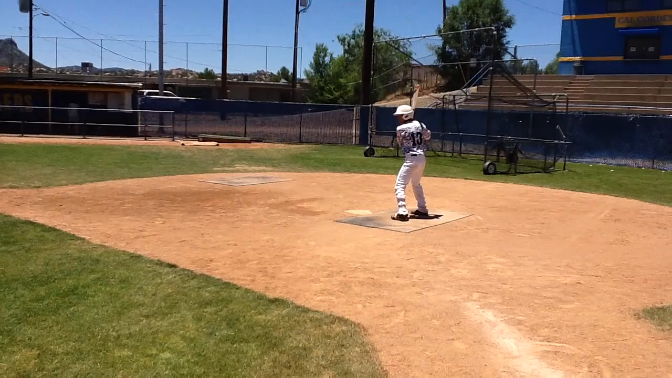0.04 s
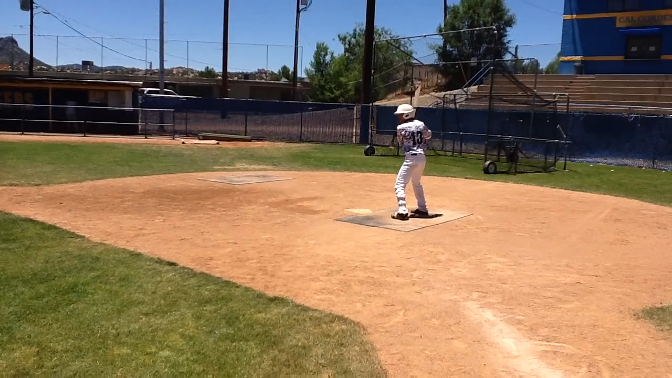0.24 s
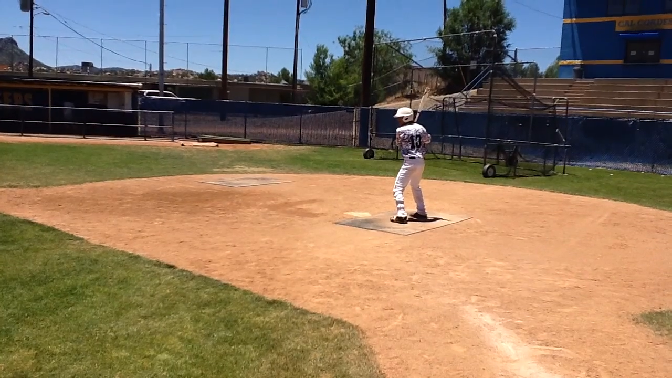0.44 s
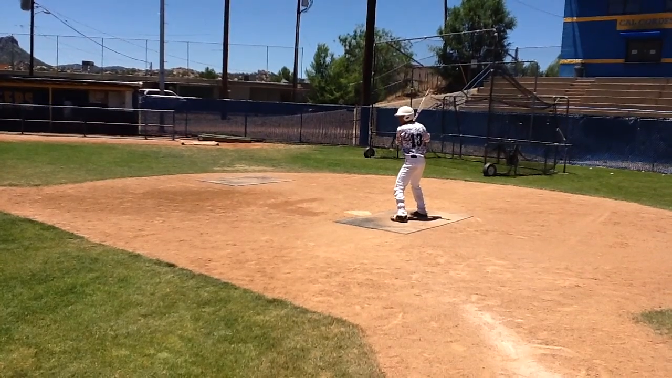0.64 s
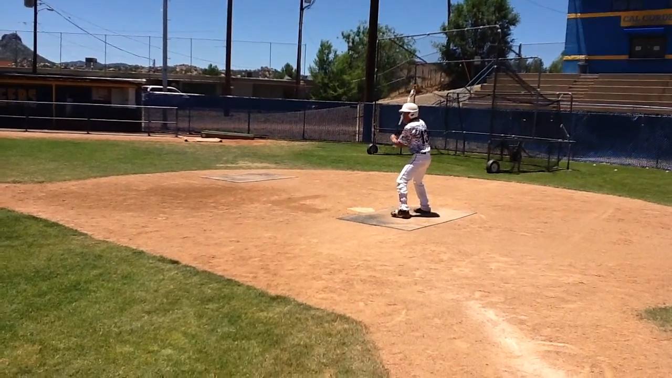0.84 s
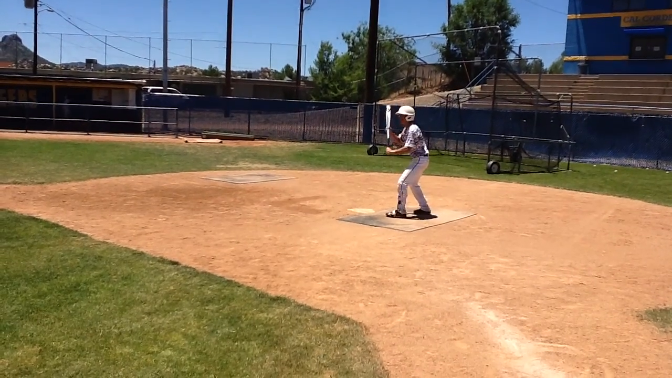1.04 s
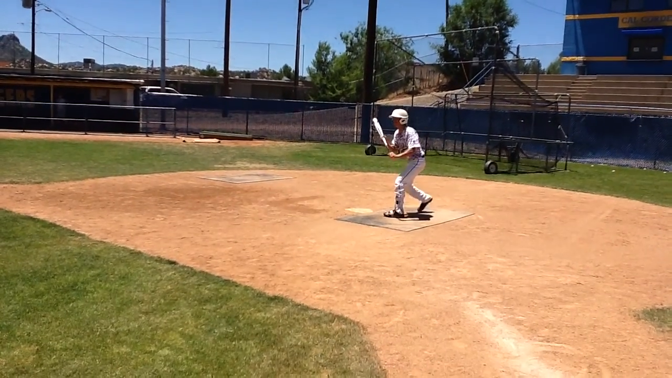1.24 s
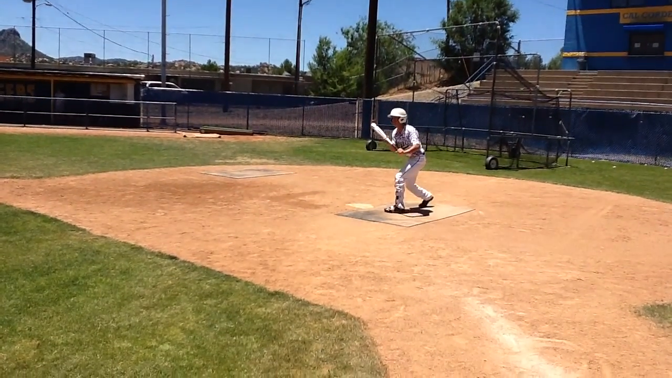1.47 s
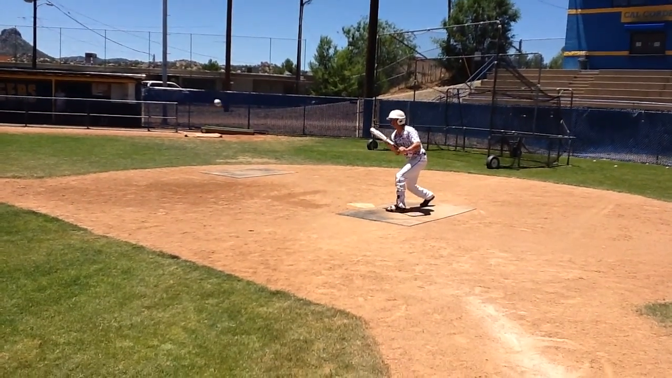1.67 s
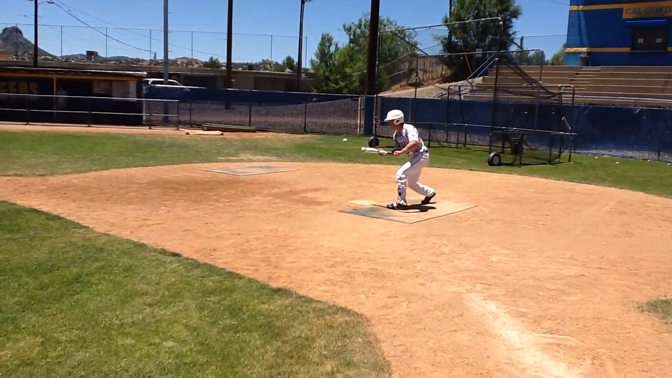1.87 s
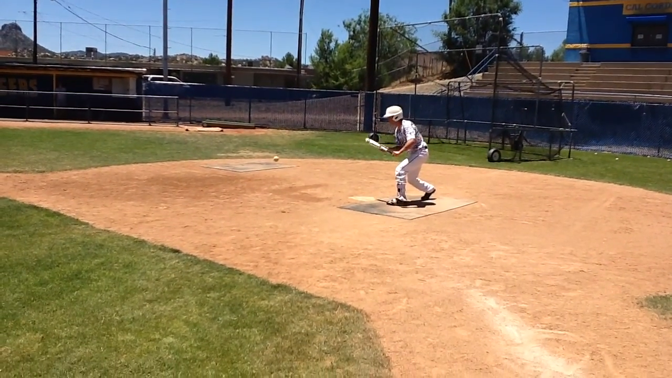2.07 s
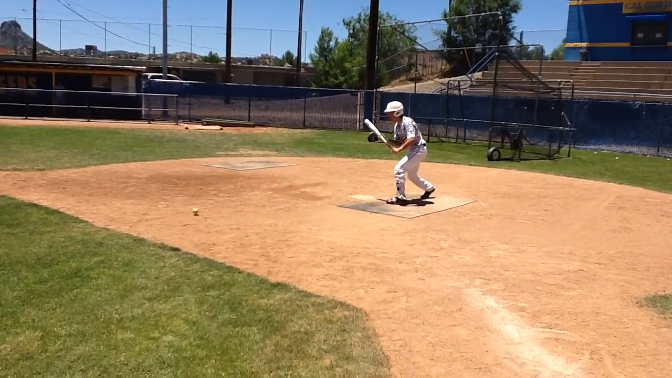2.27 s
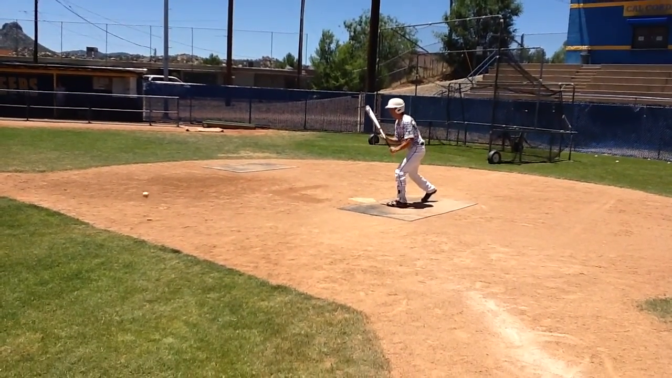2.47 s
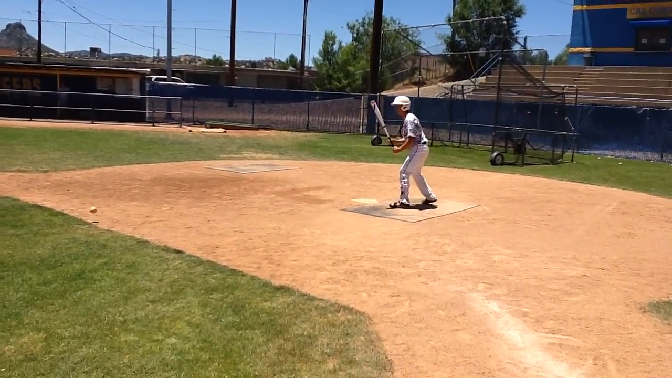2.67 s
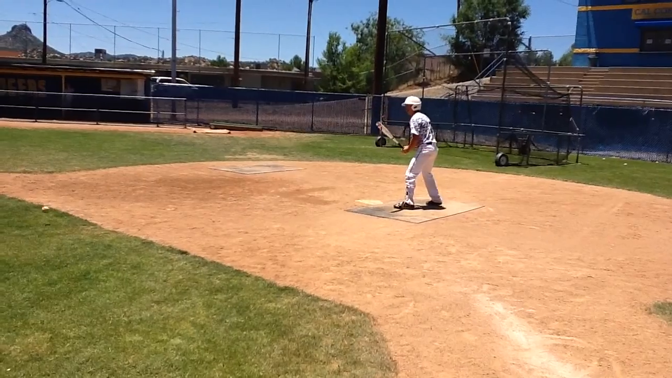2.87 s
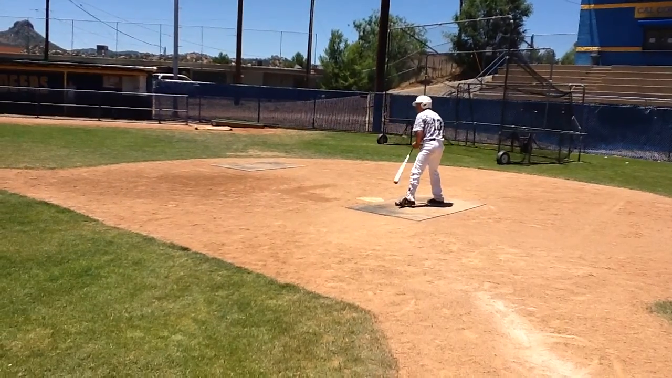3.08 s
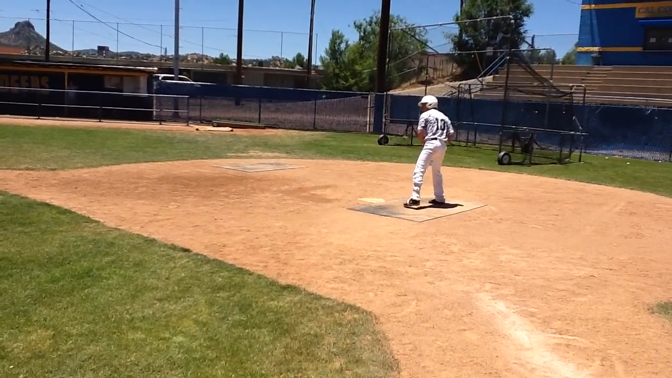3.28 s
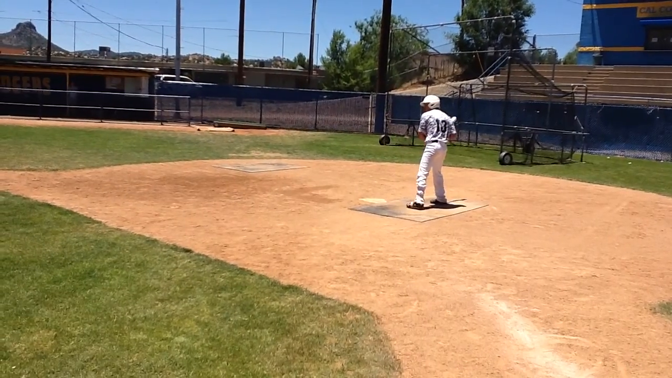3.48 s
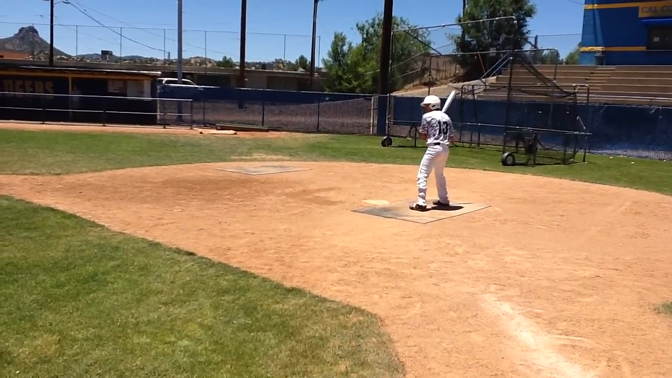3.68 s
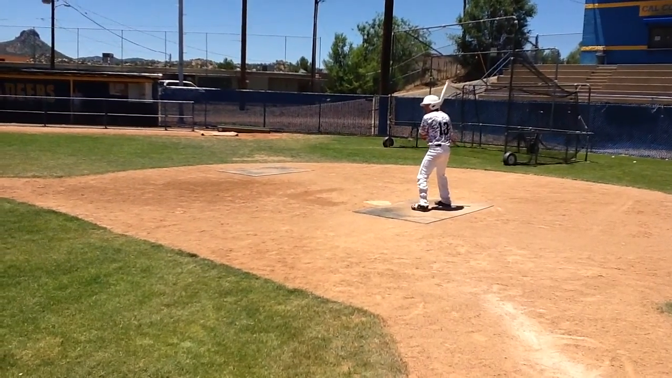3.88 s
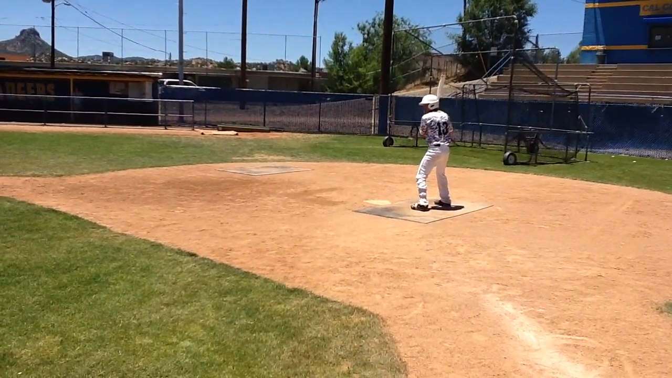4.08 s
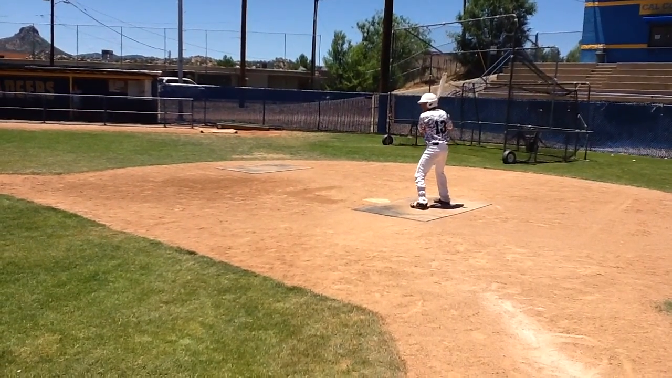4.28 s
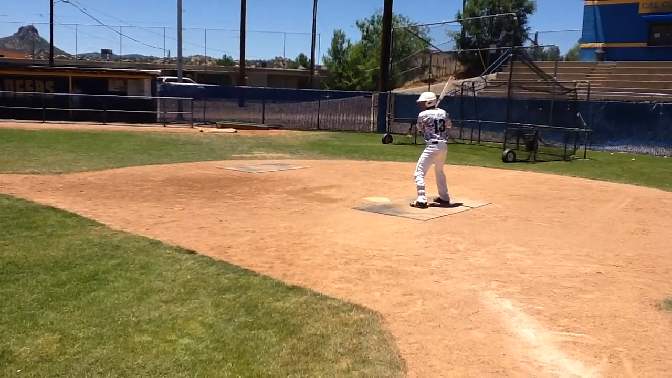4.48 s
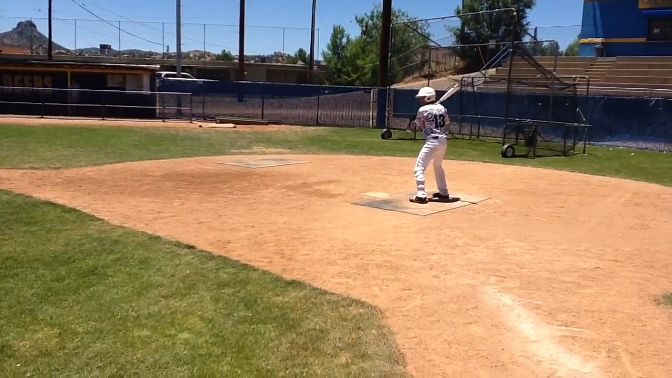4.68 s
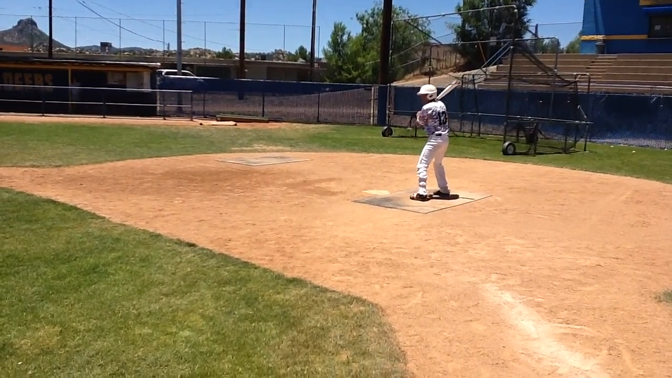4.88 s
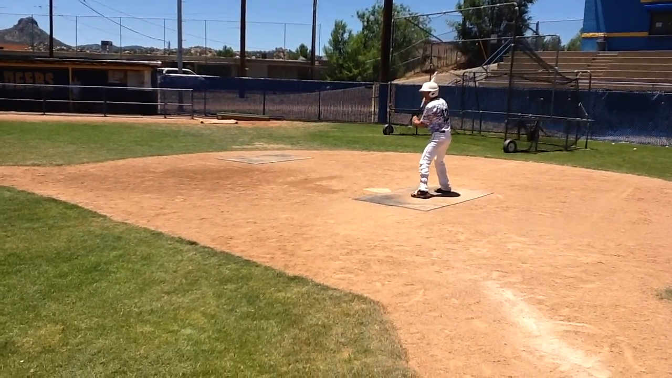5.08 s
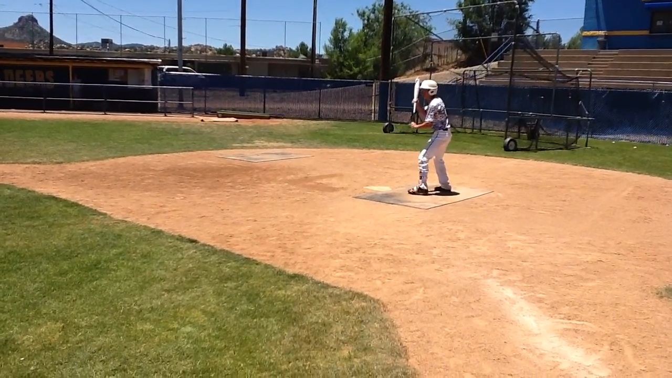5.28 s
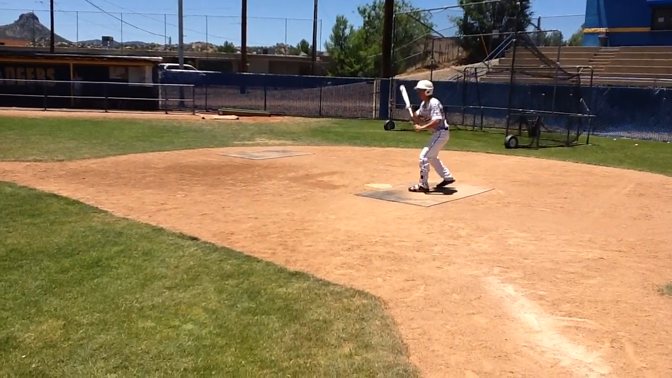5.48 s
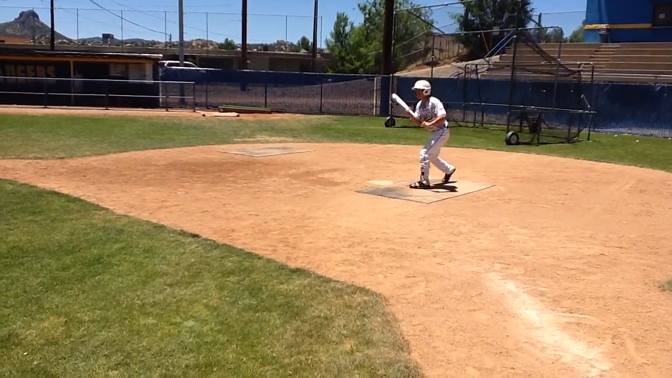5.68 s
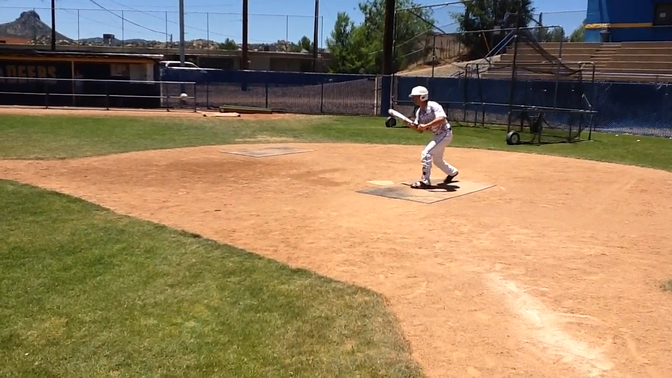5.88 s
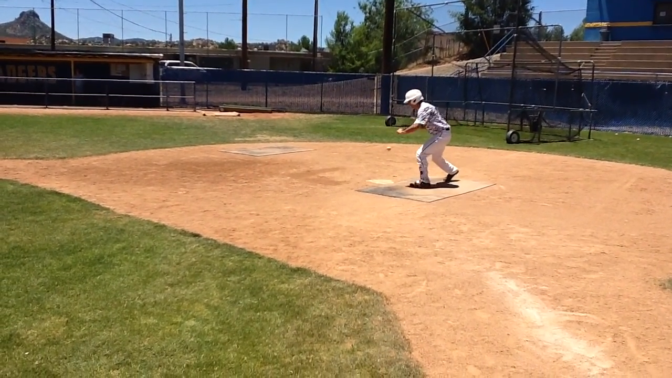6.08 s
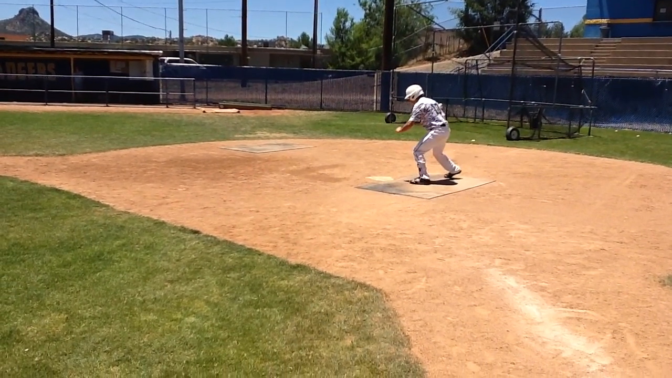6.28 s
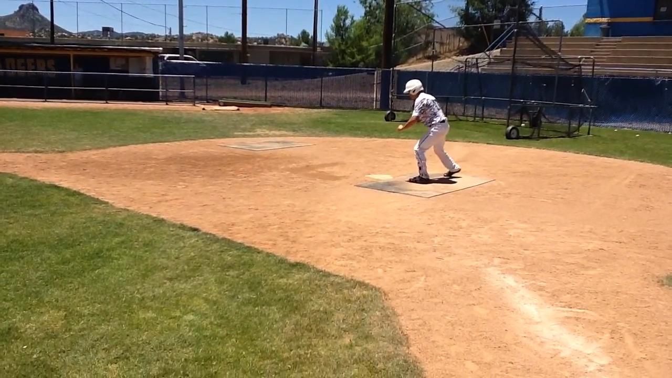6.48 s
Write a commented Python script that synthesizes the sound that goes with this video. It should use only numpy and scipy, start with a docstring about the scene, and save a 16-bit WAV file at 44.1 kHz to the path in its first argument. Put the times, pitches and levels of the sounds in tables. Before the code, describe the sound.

Soft open air and distant traffic hum under raspy bird chirps. A few gritty shoe scuffs lead to one loud, very short metallic bat knock, with thin echoes and a brief wash from the stands. The ball lands on dirt with small crunches. Birds continue as wind rises in uneven low thumps on the microphone, with more scuffs and a dull step late.

```python
"""A metal bat bunts a tossed baseball on an open field: decaying sines for the ring, a pulse and noise for
the crack, filtered copies and noise scatter for the answers of the ground, dugout, walls and stands.
The ball hops over the dirt and cleats scuff: short noise swells, with a dull push at each landing.
A songbird chatters in the trees: gliding sines. Far traffic and open air are shaped noise, with a faint
machine hum. Gusts stir the leaves and begin to buffet the microphone: noise driven by one force curve."""
import sys
import numpy as np
from scipy import signal
from scipy.fft import rfft, irfft, next_fast_len
from scipy.io import wavfile
from scipy.ndimage import map_coordinates

SR = 44100
rng = np.random.default_rng(int(sys.argv[2]) if len(sys.argv) > 2 else 0)


def dump_mix(stems):
    """Bounce the given channels to the path in sys.argv[1] as a 16-bit WAV at rate SR."""
    frames = np.atleast_2d(stems).T  # one column per channel
    limited = np.clip(frames, -1, 1)  # hard clip at full scale
    pcm = np.round(limited * 32767).astype(np.int16)
    wavfile.write(sys.argv[1], SR, pcm)


N = 288061


def amp(db):
    """Decibels to gain."""
    return 10 ** (np.asarray(db) / 20)


def unit(x):
    """Scale to rms 1."""
    return x / np.sqrt(np.mean(x ** 2) + 1e-20)


def unit_energy(x):
    """Scale to a sum of squares of 1."""
    return x / np.linalg.norm(x)


def seconds(length_s):
    """Time axis in seconds."""
    return np.arange(int(length_s * SR)) / SR


def add(track, start_s, sound):
    """Mix a sound into the track at start_s, cut at the track's end."""
    part = track[max(round(start_s * SR), 0):][:len(sound)]
    part += sound[:len(part)]


def wobble(rate_hz):
    """Smooth random curve through rate_hz random knots a second."""
    knots = rng.standard_normal(int(N * rate_hz / SR) + 4)
    return map_coordinates(knots, [np.arange(N) * rate_hz / SR])


def filtered(x, response):
    """Multiply the spectrum of x by a response of frequency in Hz."""
    size = next_fast_len(len(x) + 8192)
    gain = response(np.fft.rfftfreq(size, 1 / SR))
    return irfft(rfft(x, size) * gain, size)[:len(x)]


def noise(spectrum, size):
    """Noise of rms 1 with an (Hz, dB) spectrum, interpolated over log frequency."""
    knot_hz, knot_db = np.transpose(spectrum)
    white = rng.standard_normal(size)
    return unit(filtered(white, lambda hz: amp(np.interp(np.log(hz + 1), np.log(knot_hz), knot_db))))


def low_cut(x, hz):
    """Causal second-order high-pass."""
    return signal.sosfilt(signal.butter(2, min(hz, SR / 3), "high", fs=SR, output="sos"), x)


def high_cut(x, hz):
    """Causal first-order low-pass."""
    return signal.sosfilt(signal.butter(1, min(hz, SR / 3), fs=SR, output="sos"), x)


def swell(t, rise_s, t60_s):
    """Envelope that rises from time 0 and dies away."""
    t = np.maximum(t, 0)
    return (1 - np.exp(-t / rise_s)) * amp(-60 * t / t60_s)


# Spectrum of far traffic and open air. Each row: frequency in Hz, level in dB.
AIR_SPECTRUM = [(15, -66), (35, -38), (70, -20), (118, -14), (154, -1), (181, -17.5), (224, -8),
                (293, -25.5), (318, -22), (363, -21), (462, -20.5), (515, -19), (573, -22.5), (903, -19),
                (1910, -31.5), (3500, -38.8), (8000, -42.2), (15000, -46.7)]
# Tones of a distant machine. Each row: frequency in Hz, rms level in dB.
MACHINE_TONES = [(150.7, -58), (296, -71), (361, -73.5)]


def distance(air_db, waver_db, drift):
    """Far traffic as shaped noise, a machine as sines that waver in level and drift in pitch."""
    hum = np.zeros(N)
    for hz, db in MACHINE_TONES:
        level = amp(db + waver_db * wobble(18)) * np.sqrt(2)
        phase = 2 * np.pi * np.cumsum(hz * (1 + drift * wobble(12))) / SR
        hum += level * np.sin(phase)
    return hum + amp(air_db + 0.25 * wobble(2.93)) * noise(AIR_SPECTRUM, N)


# Wind force over time. Each row: time in seconds, force in dB.
WIND_FORCE = [(2.45, -45.5), (2.81, -41.6), (2.85, -48.2), (2.95, -41.3), (3.22, -51.2), (3.61, -37.6),
              (3.65, -40.9), (3.89, -35.5), (4.1, -46.1), (4.15, -30.3), (4.24, -45.7), (4.4, -36.9),
              (4.46, -40.6), (4.58, -27.8), (4.8, -15.5), (4.97, -31.5), (5.2, -27.7), (5.38, -40.3),
              (5.69, -28.3), (5.73, -37.8), (5.83, -25.7), (6.06, -41.5), (6.35, -25.5), (6.52, -33.7)]
# Main buffeting spectrum. Each row: frequency in Hz, level in dB.
BUFFET_SPECTRUM = [(20, -73), (50, -42), (90, -29), (130, -6), (165, 1.5), (230, -6.5), (320, -15.5),
                   (450, -28), (700, -43), (1500, -70), (4000, -100)]
# Deep rumble spectrum. Each row: frequency in Hz, level in dB.
RUMBLE_SPECTRUM = [(20, -29), (40, -34), (65, -7.5), (100, 5.5), (150, 1.5), (250, -16), (600, -51),
                   (2000, -100)]
# Spectrum of small, higher eddies. Each row: frequency in Hz, level in dB.
EDDY_SPECTRUM = [(110, -39), (190, -1), (340, 3), (470, -4.5), (650, -13.5), (900, -22.5), (1200, -40),
                 (3000, -86)]
# Single eddies that thump the microphone. Each row: centre in seconds, level in dB, frequency in Hz.
THUMPS = [(2.792, -36, 169), (3.725, -30, 230), (3.877, -30, 190), (4.15, -28, 162), (4.796, -18, 237.4),
          (4.853, -16.5, 172.4), (5.201, -21, 201), (5.689, -20.5, 163), (6.356, -17, 216)]
# Spectrum of stirred trees. Each row: frequency in Hz, level in dB.
LEAF_SPECTRUM = [(300, -30), (3000, -6), (9000, 0), (15000, -1)]
CALM_DB, FRESHEN_S = -60, 0.31  # force before the gusts, time to freshen to the first row
LEAVES_DB, LEAVES_DB_PER_DB = -70, .15  # level in the hardest gust, slope over force


def wind(lump_db, buffet_db, rumble_db, eddy_db, eddy_db_per_db, full_db):
    """Gusts stir leaves and buffet the mic; as force grows, rumble levels off and small eddies take over."""
    knot_s, knot_db = np.transpose(WIND_FORCE)
    times_s = np.r_[knot_s[0] - FRESHEN_S, knot_s]
    force_db = np.interp(np.arange(N) / SR, times_s, np.r_[CALM_DB, knot_db])
    force = amp(force_db)
    below_peak_db = force_db - knot_db.max()
    rumble = amp(rumble_db) * noise(RUMBLE_SPECTRUM, N) / np.hypot(1, force / amp(full_db))
    buffet = amp(buffet_db) * unit(noise(BUFFET_SPECTRUM, N) * amp(lump_db * wobble(60)))
    eddies = unit(noise(EDDY_SPECTRUM, N) * amp(lump_db * wobble(90)))
    eddies *= amp(eddy_db + eddy_db_per_db * below_peak_db)
    leaves = amp(LEAVES_DB + LEAVES_DB_PER_DB * below_peak_db) * noise(LEAF_SPECTRUM, N)
    out = force * (rumble + buffet + eddies) + leaves
    t = seconds(.04) - .02  # centred on the thump
    for centre_s, db, hz in THUMPS:
        envelope = np.exp(-(t * hz / 0.71) ** 2)
        add(out, centre_s + t[0], amp(db) * envelope * np.sin(2 * np.pi * hz * t))
    return out


FADE_HZ = 2950  # the bird's voice fades below this pitch
KINK = .45  # turn at the middle pitch: 0 smooth arc, 1 corner


def whistle(length_s, start_hz, middle_hz, end_hz, rasp):
    """One note bends through three pitches, weak at the low end; fast random pitch flutter makes it raspy."""
    t = seconds(length_s)
    u = np.linspace(0, 1, num=len(t))
    knots = [0, .5, 1], [start_hz, middle_hz, end_hz]
    arc_hz = np.polyval(np.polyfit(*knots, 2), u)
    hz = (1 - KINK) * arc_hz + KINK * np.interp(u, *knots)
    flutter = np.interp(u, np.linspace(0, 1, num=40), rng.standard_normal(40))
    envelope = np.sqrt(2 * np.abs(np.sin(np.pi * u))) / np.hypot(1, (FADE_HZ / hz) ** 20)
    return envelope * np.sin(2 * np.pi * np.cumsum(hz * (1 + rasp * flutter)) / SR)


# Notes of the stock phrase. Each row: start in seconds from the phrase time, length in seconds,
# start pitch in Hz, middle pitch in Hz, end pitch in Hz, level in dB.
PHRASE_NOTES = [(-.075, .05, 5200, 5380, 5380, -14), (-.03, .036, 3400, 4550, 5370, -3),
                (-.002, .03, 4950, 3820, 3300, -8), (0.012, .03, 3600, 3150, 2850, -8.5),
                (.042, .032, 2950, 3488, 4350, -3.5), (0.09, .032, 2850, 3354, 4300, -5)]
# Singings of the phrase. Each row: phrase time in seconds, level in dB.
PHRASE_TIMES = [(.237, -54), (.526, -62), (.96, -56), (1.462, -57), (2.152, -57.5), (2.653, -59.5),
                (3.654, -50.5), (4.313, -54), (4.915, -54), (6.47, -53.5)]
# Notes that dip and rise. Each row: bottom time in seconds, length in seconds, bottom pitch in Hz, level in dB.
DIP_NOTES = [(0.13, .048, 4000, -66), (.27, .052, 4450, -65), (0.4, .064, 4100, -63),
             (2.592, .08, 2750, -59), (2.93, .075, 2720, -61.5), (3.122, .085, 2680, -59.5),
             (3.232, .045, 3300, -69), (3.292, .035, 3020, -63.5), (4.814, 0.029, 3580, -62.5),
             (5.941, .042, 3850, -64), (6.008, 0.056, 3550, -63.5), (6.066, .06, 4050, -60),
             (6.198, .058, 3900, -58), (6.337, .046, 3900, -64)]
# Runs of falling slurs. Each row: start in seconds, first top pitch in Hz, level in dB, count of slurs.
FALL_RUNS = [(.527, 4450, -57, 2), (1.654, 4470, -62, 2), (1.806, 3650, -64, 1), (2.21, 3810, -63, 1),
             (2.70, 4170, -64.5, 2), (2.945, 3500, -66, 1), (3.37, 4200, -69, 1), (3.508, 4550, -61, 2),
             (3.94, 4420, -70, 2), (5.015, 3844, -61, 1), (5.34, 4450, -61.5, 2)]
DIP_RISE, DIP_TOP_HZ = 1.36, 5450  # end pitch over bottom pitch, its ceiling
FALL_S, FALL_EVERY_S, FALL_END_HZ = .042, .052, 2953
FALL_SAG, FALL_STEP = .27, .88  # share of the drop made halfway, each top over the last
SCOOP_S, SCOOP_DB = .022, -5  # upstroke into each slur, level relative to the slur


def bird(phrase_rasp, slur_rasp, echo_db, echo_t60_s, far_db, flicker_db):
    """A bird mixes raspy phrases with cleaner dips and slurs; others twitter far off; trees scatter it all."""
    song = np.zeros(N)
    for phrase_s, db in PHRASE_TIMES:
        for offset_s, length_s, start_hz, middle_hz, end_hz, note_db in PHRASE_NOTES:
            note = whistle(length_s, start_hz, middle_hz, end_hz, phrase_rasp)
            add(song, phrase_s + offset_s, amp(db + note_db) * note)
    for bottom_s, length_s, bottom_hz, db in DIP_NOTES:
        top_hz = min(DIP_RISE * bottom_hz, DIP_TOP_HZ)
        note = whistle(length_s, top_hz, bottom_hz, top_hz, slur_rasp)
        add(song, bottom_s - length_s / 2, amp(db) * note)
    for run_s, first_hz, db, count in FALL_RUNS:
        for k in range(round(count)):
            top_hz = first_hz * FALL_STEP ** k
            slur_s = run_s + k * FALL_EVERY_S
            scoop = whistle(SCOOP_S, FALL_END_HZ, (FALL_END_HZ + top_hz) / 2, top_hz, slur_rasp)
            add(song, slur_s - SCOOP_S, amp(db + SCOOP_DB) * scoop)
            halfway_hz = top_hz - FALL_SAG * (top_hz - FALL_END_HZ)
            add(song, slur_s, amp(db) * whistle(FALL_S, top_hz, halfway_hz, FALL_END_HZ, slur_rasp))
    for when, *bend in rng.random(size=(30, 4)):  # far birds: random times and pitches
        pitches_hz = 3000 + 2400 * np.array(bend)
        add(song, when * N / SR, amp(far_db) * whistle(.045, *pitches_hz, slur_rasp))
    song *= amp(flicker_db * wobble(150))  # flutter in strength
    t = seconds(.5)
    tail = unit_energy(rng.standard_normal(len(t)) * amp(-60 * t / echo_t60_s))
    return song + amp(echo_db) * signal.fftconvolve(song, tail)[:N]


# Cleats scuff the grit. Each row: start in seconds, level in dB, length in seconds.
SCUFFS = [(.923, -53, 0.011), (1.077, -46.5, 0.011), (1.197, -58, 0.046), (1.377, -53.5, 0.014),
          (1.424, -49, .006), (1.567, -54, .008), (2.256, -58, 0.013), (2.704, -59, 0.019),
          (3.426, -58.5, .024), (3.498, -55, .006), (5.229, -52, .014), (5.263, -54, .011),
          (5.41, -51.5, 0.018), (5.553, -55, .03), (5.792, -49.5, .017), (6.242, -53, 0.014),
          (6.297, -47, .012)]
# Spectrum of scuffed grit. Each row: frequency in Hz, level in dB.
GRIT_SPECTRUM = [(400, -19), (1500, 5), (4000, -19.5), (7000, -8.5), (10000, -6.5), (14000, -10),
                 (16000, -3)]
SAND_DB, SAND_S = -12.5, 0.073  # settling sand: level relative to the scuff, length


def cleats(grain_db):
    """Each scuff is a short noise swell of uneven sand grains; the kicked sand settles after it."""
    out, t = np.zeros(N), seconds(.25)

    def hump(length_s):
        """Envelope that peaks at 1 after a third of its length."""
        return 3 * t / length_s * np.exp(1 - 3 * t / length_s)

    knots_s = t[::40]
    for start_s, db, length_s in SCUFFS:
        grains_db = grain_db * np.interp(t, knots_s, rng.standard_normal(len(knots_s)))
        grains = unit(amp(grains_db)) * noise(GRIT_SPECTRUM, len(t))
        add(out, start_s, amp(db) * (hump(length_s) + amp(SAND_DB) * hump(SAND_S)) * grains)
    return out


# A ball lands or a shoe taps. Each row: start in seconds, grit level in dB, thud level in dB, grit high cut in Hz.
BOUNCES = [(.933, -44, -64, 7000), (1.231, -34, -54, 2400), (2.3996, -26, -40, 13000),
           (2.855, -41, -50, 9500), (5.5656, -34, -56, 4000), (6.299, -19, -25, 2300),
           (6.366, -33.5, -50, 6000)]
# Spectrum of crushed dirt. Each row: frequency in Hz, level in dB.
DIRT_SPECTRUM = [(300, 3.5), (1000, -3.5), (1800, -4.5), (3000, -7.5), (5500, -6), (7500, -5), (8500, -12),
                 (13000, -10), (16000, -32)]


def bounces(crush_s, thud_s):
    """A landing ball or shoe crushes grit for an instant and gives the ground one dull push."""
    out, t = np.zeros(N), seconds(.04)
    crush = (t / crush_s) ** 2 * np.exp(2 * (1 - t / crush_s))  # peaks at 1 at crush_s
    u = t / thud_s - 2
    thud = 2 * u * np.exp(-u * u)
    for start_s, grit_db, thud_db, high_hz in BOUNCES:
        grit = crush * noise(DIRT_SPECTRUM, len(t))
        grit = high_cut(high_cut(grit, high_hz), high_hz)  # a soft contact is duller
        add(out, start_s, amp(grit_db) * grit + amp(thud_db) * thud)
    return low_cut(out, hz=170)


# Ring of bat and ball. Each row: frequency in Hz, level in dB, t60 in seconds.
BAT_MODES = [(475, -19, 0.021), (770, -19, 0.015), (1030, -8.5, 0.027), (1276, -8, 0.011),
             (1470, -8, 0.013), (1620, -38, 0.012), (2140, -11.5, 0.013), (3356, -17, 0.042),
             (3590, -17, .011), (4970, -48, .012), (7230, -26, 0.01), (7860, -29.5, 0.011),
             (8600, -44, .012), (10260, -37, 0.011)]


def bat(snap_db, crackle_db, crackle_t60_s, contact_s, crackle_high_cut_hz, low_cut_hz):
    """The blow rings the barrel's modes; a sharp snap and a brief crackle ride on its front."""
    t = seconds(.3)
    ring = sum(amp(db - 60 * t / t60_s) * np.sin(2 * np.pi * hz * t) for hz, db, t60_s in BAT_MODES)
    ring *= 1 - np.exp(-t / contact_s)
    snap = amp(snap_db) * np.exp(-((t - .0003) / .000025) ** 2)
    crackle = amp(crackle_db - 60 * t / crackle_t60_s) * rng.standard_normal(len(t))
    front = low_cut(snap + high_cut(crackle, crackle_high_cut_hz), hz=600)
    return low_cut(ring + front, low_cut_hz)


# Walls that answer. Each row: delay in seconds, level in dB, low cut in Hz, high cut in Hz, smear in seconds.
WALLS = [(0.025, -15, 2300, 4600, 0.0071), (0.065, -32, 3000, 4500, .006),
         (0.0807, -6.5, 1900, 4200, 0.0012), (0.087, -16, 1900, 4500, 0.0022),
         (.1072, -11.5, 2100, 8200, .0003), (0.116, -19, 2800, 4934, .006)]
# Scatter from the nearby fence and the stands. Each row: delay in seconds, relative level in dB,
# rise in seconds, t60 in seconds.
STANDS_SWELLS = [(.002, 8, .02, 0.74), (.105, 16.5, .02, .33)]
# Spectrum of that scatter. Each row: frequency in Hz, level in dB.
STANDS_SPECTRUM = [(300, -7), (1000, -19.5), (2000, -10.5), (2900, -3), (3400, 3.5), (4200, -4),
                   (9000, -19), (15000, -17)]
HIT_S = 1.9453


def field(blow, stands_db, ground_db, ground_t60_s):
    """The blow, ground scatter, thin echoes off ribbed walls, and a wash from the fence and rows of seats."""
    out = np.zeros(N)
    add(out, HIT_S, blow)
    t = seconds(.06)
    clods = unit_energy(rng.standard_normal(len(t)) * amp(-60 * t / ground_t60_s))
    add(out, HIT_S, amp(ground_db) * signal.fftconvolve(low_cut(blow, hz=7000), clods))
    for delay_s, db, low_hz, high_hz, smear_s in WALLS:
        wall = .5 * unit_energy(rng.standard_normal(len(t)) * np.exp(-t / smear_s))
        wall[0] += 1  # the flat face mirrors the blow, the ribs smear it
        thin = low_cut(low_cut(blow, low_hz), low_hz)  # long waves bend round a small wall
        dull = high_cut(high_cut(thin, high_hz), high_hz)  # the air path costs treble
        add(out, HIT_S + delay_s, amp(db) * signal.fftconvolve(dull, wall))
    t = seconds(.8)
    power = np.zeros(len(t))
    for delay_s, db, rise_s, t60_s in STANDS_SWELLS:
        power += (swell(t - delay_s, rise_s, t60_s) * amp(db)) ** 2
    seats = unit_energy(noise(STANDS_SPECTRUM, len(t)) * np.sqrt(power))
    add(out, HIT_S, amp(stands_db) * signal.fftconvolve(blow, seats))
    return out


def scene():
    """All sources summed at one microphone."""
    blow = bat(snap_db=-7, crackle_db=-13, crackle_t60_s=0.016, contact_s=0.00034,
               crackle_high_cut_hz=7100, low_cut_hz=154)
    play = field(blow, stands_db=-20.5, ground_db=-16, ground_t60_s=0.067)
    play += bounces(crush_s=0.00082, thud_s=0.00091) + cleats(grain_db=7)
    song = bird(phrase_rasp=.065, slur_rasp=0.018, echo_db=-7, echo_t60_s=0.3, far_db=-76, flicker_db=3.0)
    gusts = wind(lump_db=3.0, buffet_db=-5.3, rumble_db=-6, eddy_db=-5, eddy_db_per_db=1.1, full_db=-32.5)
    background = distance(air_db=-52, waver_db=0.8, drift=0.005)
    return (play + song + gusts + background)[None]


# A moment of silence. The pair: start in seconds, end in seconds.
DROPOUT_S = (.0212, .069)
TOP_HZ, EDGE_HZ = 15450, 600  # centre and width of the band limit's slope


def record(dry):
    """The sound drops out for a moment near the start; nothing passes above the band limit."""
    t = np.arange(N) / SR
    live = (t < DROPOUT_S[0]) | (t > DROPOUT_S[1])
    return filtered(dry[0] * live, lambda hz: np.clip((TOP_HZ - hz) / EDGE_HZ + .5, 0, 1))[None]


dry = scene()
out = record(dry)
dump_mix(out)
```